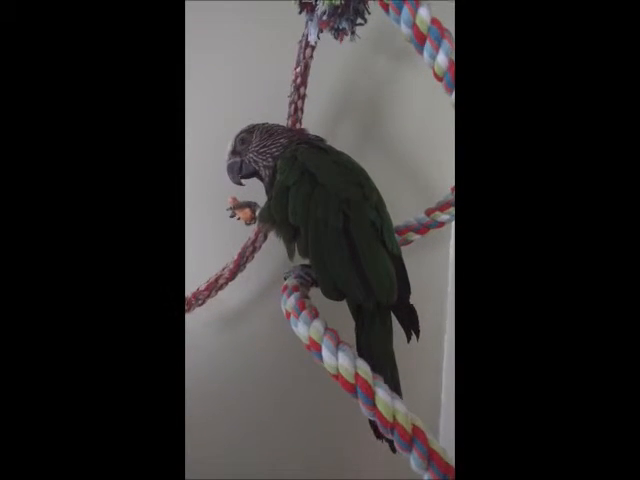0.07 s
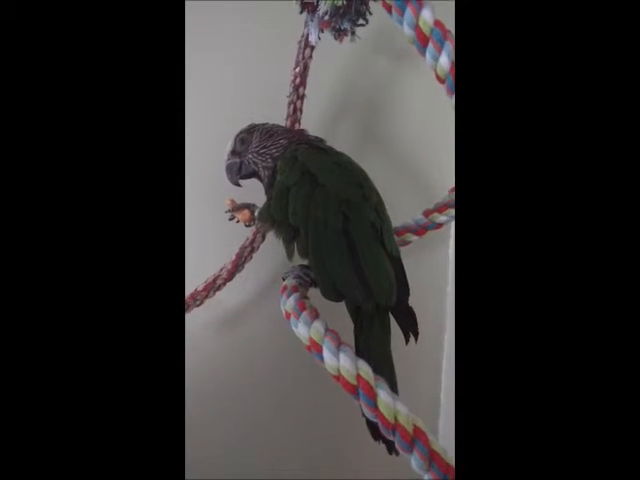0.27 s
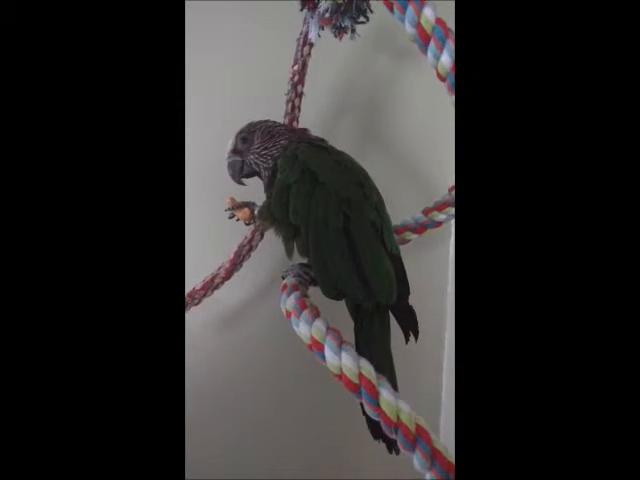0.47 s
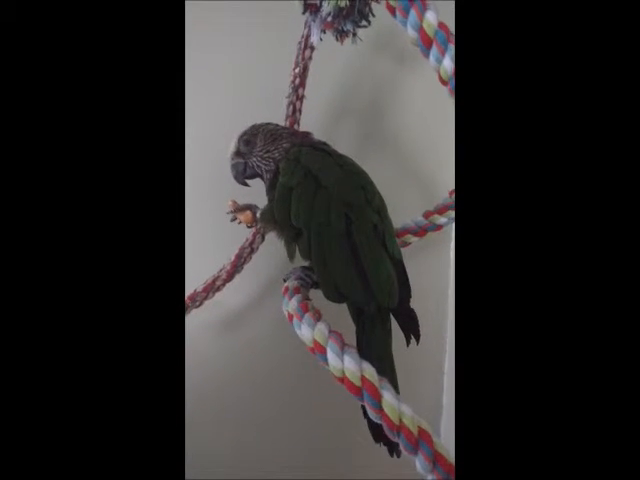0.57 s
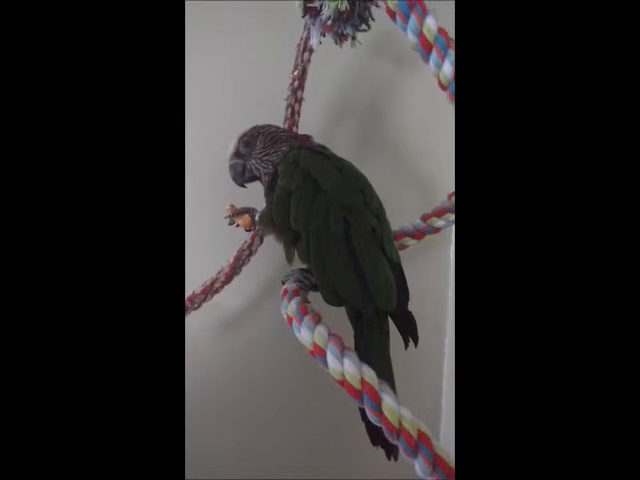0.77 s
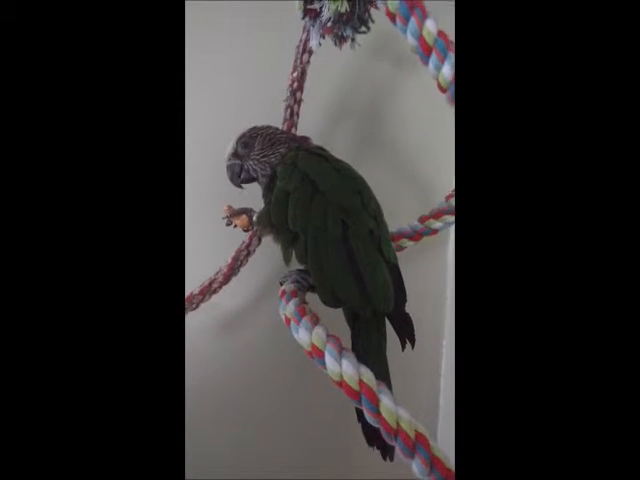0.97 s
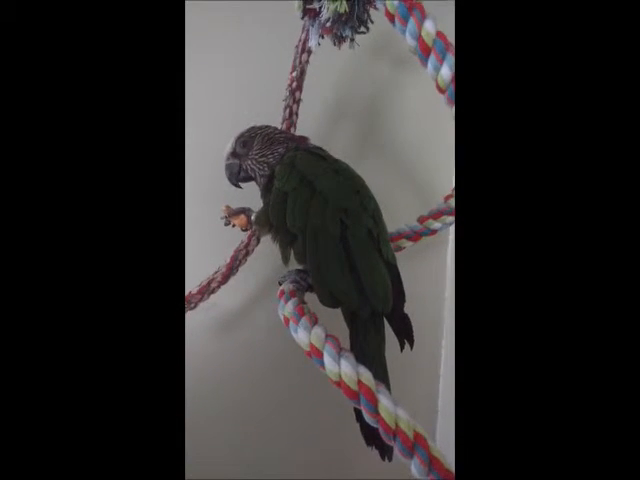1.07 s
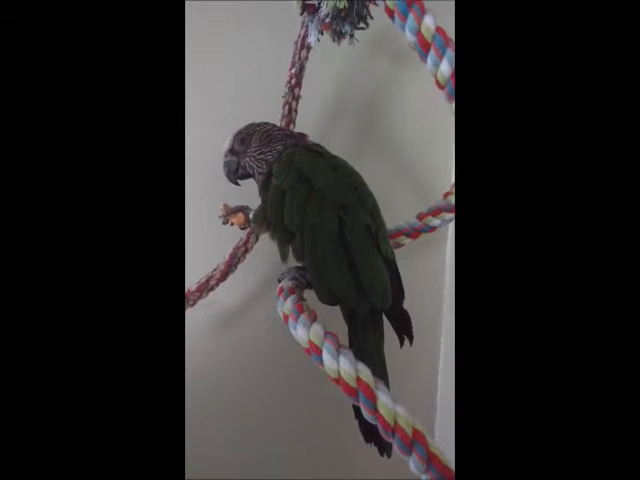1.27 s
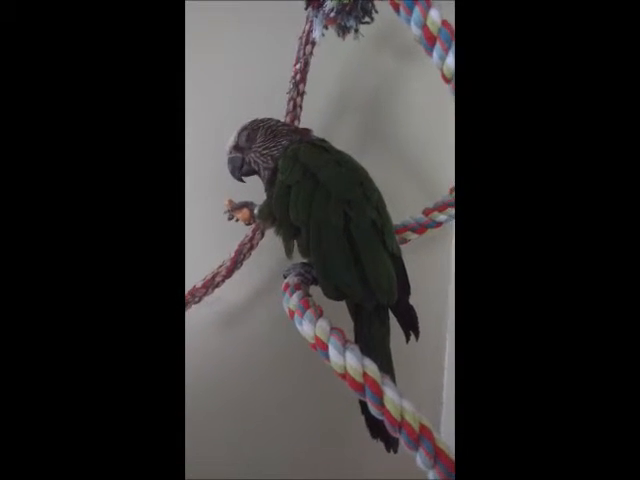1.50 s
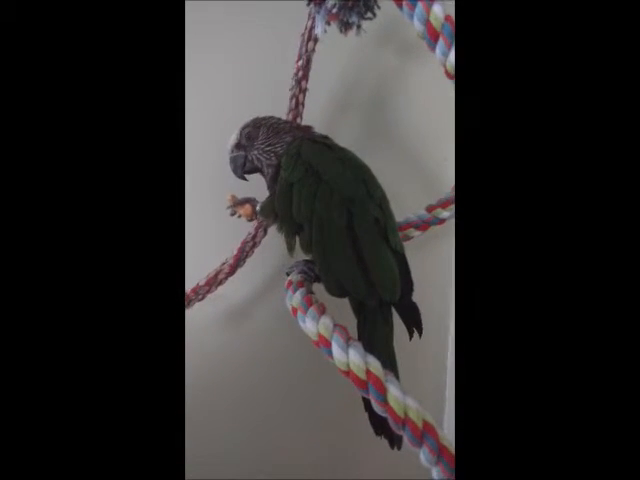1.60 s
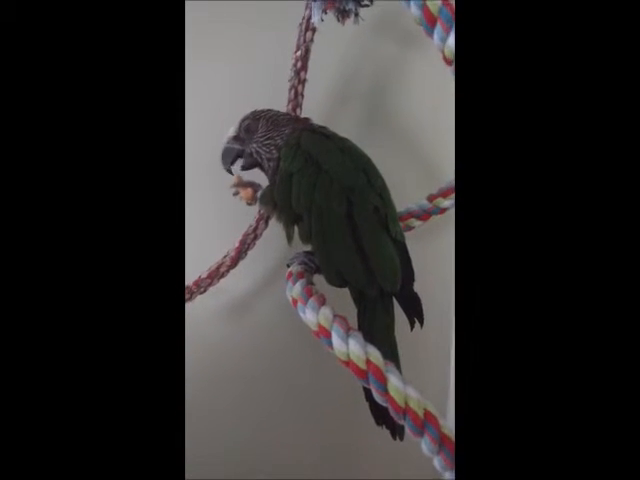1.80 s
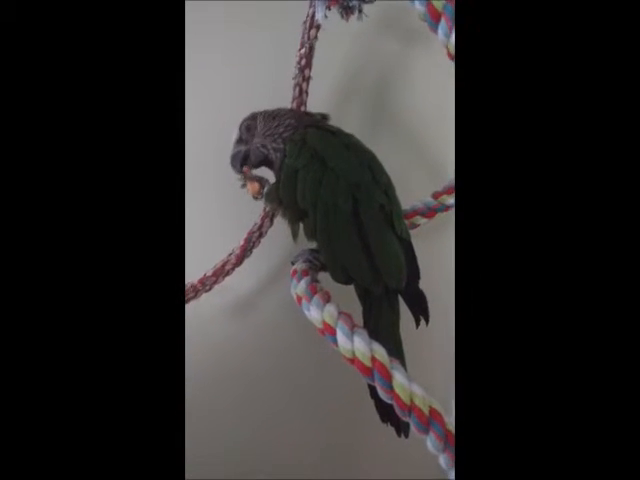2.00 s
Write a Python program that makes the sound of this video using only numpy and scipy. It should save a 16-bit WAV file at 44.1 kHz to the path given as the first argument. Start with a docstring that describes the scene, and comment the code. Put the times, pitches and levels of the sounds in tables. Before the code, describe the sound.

A parrot close to the microphone gives one short, rough, fluttering croak, then a tiny high chirp. Its beak ticks faintly on food, while an appliance hums and its fan whirs steadily in the small room.

```python
"""A small room, where an appliance hums and its fan whirs steadily in the background.
Up close, a parrot on a rope perch gives one short croak: a rough throat tone that flutters in
pitch and level, with rasp on each pulse. A tiny chirp follows, a scratch with thin tones ringing
out of it. The beak ticks on a morsel of food, and one faint squeak sounds at the very start."""
import sys
import numpy as np
from scipy import signal
from scipy.fft import rfft, irfft
from scipy.io import wavfile

SR = 44100
rng = np.random.default_rng(int(sys.argv[2]) if len(sys.argv) > 2 else 0)


def digitize_waveform(pressure):
    """Quantize a signal to 16-bit integers and store it at the path in sys.argv[1].

    Rows of a 2-D input are taken as channels; values are limited to [-1, 1].
    """
    field = np.atleast_2d(pressure).T
    bounded = np.clip(field, -1, 1)
    quanta = np.round(bounded * 32767).astype(np.int16)
    wavfile.write(sys.argv[1], SR, quanta)


N = 90404
T = np.arange(N) / SR
HZ = np.maximum(np.arange(N // 2 + 1) * SR / N, 1)
SIDES = np.array([[.5], [-.5]])   # splits a pan or a phase lead between left (+) and right (-)


def from_db(db):
    """Decibels to gain."""
    return 10 ** (np.asarray(db) / 20)


def unit_rms(x):
    """Scale to unit rms."""
    return x / np.sqrt(np.mean(x ** 2) + 1e-20)


def curve(points):
    """An automation curve at every sample."""
    return np.interp(T, *np.transpose(points))


def at_hz(points, hz):
    """Read an EQ curve on a log-frequency axis."""
    freqs, values = np.transpose(points)
    return np.interp(np.log(hz), np.log(freqs), values)


def noise(colour):
    """Coloured noise of unit rms."""
    return unit_rms(irfft(rfft(rng.standard_normal(N)) * from_db(at_hz(colour, HZ)), N))


def stereo_noise(colour):
    """Wide noise, unrelated left and right."""
    return np.array([noise(colour), noise(colour)])


def drift(rate_hz):
    """Smooth random modulation of unit rms."""
    return unit_rms(irfft(rfft(rng.standard_normal(N)) / (1 + (HZ / rate_hz) ** 2), N))


def burst(start_s, attack_s, hold_s, t60_s):
    """Attack, hold and exponential release."""
    age = T - start_s
    return np.clip(age / attack_s, 0, 1) * from_db(-60 * np.maximum(age - attack_s - hold_s, 0) / t60_s)


# Phase between the channels: freq_hz, left_lead_rad
STEREO_LEAD = [(60, 2), (130, 1.7), (290, .5), (640, -.1), (1250, -.1), (1700, 1), (2200, 2.8), (2600, 3.3),
               (5200, 9.4), (15600, 34.6)]
# Balance between the channels: freq_hz, pan_left_db
STEREO_PAN = [(60, -4), (110, 10.5), (200, -11), (380, 3), (580, 7.5), (730, 1.5), (900, 2), (1290, -1.5),
              (2380, -3), (4400, 1.5), (8120, 0.5), (15000, 0.5)]

def stereo_image(x):
    """Each frequency reaches the two microphone ports with its own phase and level difference."""
    lead = np.interp(HZ, *np.transpose(STEREO_LEAD)) * SIDES
    gain = from_db(at_hz(STEREO_PAN, HZ) * SIDES)
    return irfft(rfft(x) * np.exp(1j * lead) * gain / np.sqrt(np.mean(gain ** 2, axis=0)), N)


def room(x, level_db, t60_s, predelay_s=.003):
    """A short diffuse reverb tail, different on each side."""
    tail = rng.standard_normal((2, N)) * burst(predelay_s, .0033, 0, t60_s)
    tail /= np.sqrt(np.sum(tail ** 2, axis=1, keepdims=True))
    return from_db(level_db) * signal.fftconvolve(x[None], tail, axes=1)[:, :N]


# Colour of the fan noise: freq_hz, gain_db
FAN_EQ = [(25, -59), (55, -14), (80, -25), (110, -4.5), (165, 2.5), (205, -2), (260, 1.5), (350, -5),
          (600, -3), (820, -1), (1150, -4.5), (1450, -7), (1800, -3.5), (2300, -8), (2800, -13.5),
          (3500, -10), (4000, -18.5), (4800, -18), (6200, -21.5), (8000, -29.5), (10000, -30.5),
          (14500, -41), (15800, -56)]
# Tones of the motor hum: pitch_hz, level_db, pan_left_db, left_lead_rad
MOTOR_TONES = [(119.9, -47.5, 9.5, 2.23), (217.1, -45.5, 6.5, 1.97), (236.2, -57, 16.5, 1.6),
               (296, -60.5, 18.5, 3.6), (360.6, -55.5, 6, 1.4), (430.8, -49, 1.5, 0.8),
               (869, -63, 19, 0.23), (904, -65, -10, 0.82)]
# Level of the background, which dips briefly after the chirp: time_s, gain_db
BED_LEVEL = [(0, 0.5), (.63, -0.5), (.645, -4.5), (.76, -3), (.92, -.5), (1.25, 0.78), (2.04, 0)]

def appliance(fan_db=-40, waver_db=2, waver_rad=.3):
    """The bed: wavering motor tones over fan noise that the room colours."""
    whir = from_db(fan_db) * noise(FAN_EQ)
    bed = stereo_image(whir) + room(whir, level_db=-7, t60_s=.38)
    for hz, db, pan_db, lead in MOTOR_TONES:
        phase = 2 * np.pi * (hz * T + rng.random()) + waver_rad * drift(6)
        level = from_db(db + pan_db * SIDES + waver_db * drift(36))
        bed += np.sqrt(2) * level * np.sin(phase + lead * SIDES)
    return from_db(curve(BED_LEVEL)) * bed


def squeak(pitch_hz=3370, level_db=-49):
    """One faint, slightly unsteady whistle."""
    whistle = np.sin(2 * np.pi * pitch_hz * T + .7 * drift(120))
    return from_db(level_db) * whistle * burst(start_s=.022, attack_s=.0019, hold_s=.016, t60_s=.032)


# Colour shared by the ticks: freq_hz, gain_db
TICK_EQ = [(1500, -18), (3400, 10.5), (5000, -3.5), (6400, 3), (7800, -4.5), (9000, 0), (11000, -13.5),
           (14500, -11), (16500, -30)]
# Beak cues: start_s, gain_db, t60_s, low_cut_hz, high_cut_hz
BEAK_TICKS = [(0.1067, -36, 0.017, 5000, 9000), (0.493, -33.5, 0.015, 5500, 12100),
              (0.502, -42, .015, 4000, 11000), (0.928, -34, 0.037, 2800, 4500),
              (0.9557, -30.5, 0.014, 4940, 15000), (1.0264, -40, 0.023, 5500, 7000)]

def beak():
    """Small dry cracks of nibbling, some thinner and some duller than others."""
    crackle = stereo_noise(TICK_EQ)
    ticks = np.zeros((2, N))
    for start_s, db, t60_s, low_hz, high_hz in BEAK_TICKS:
        crack = crackle * from_db(db) * burst(start_s, attack_s=.0006, hold_s=.001, t60_s=t60_s)
        band = 1 / np.sqrt((1 + (low_hz / HZ) ** 4) * (1 + (HZ / high_hz) ** 4))
        ticks += irfft(rfft(crack) * band, N)
    return ticks


# Ringing tones of the chirp: pitch_hz, gain_db, t60_s, pan_left_db, left_lead_rad
CHIRP_TONES = [(6121, -2.5, .105, 4, 0), (6538, -15, .13, -2, -.9), (6952, -8.5, .135, 7, -.4),
               (7900, -1, .115, 2, 2.8), (8411, -7.5, .07, 14, .2), (8742, -16, .07, -6, .5),
               (9226, -13, .09, 2, -1.1), (9570, -15, .1, 0, -1.2), (10070, -17, .14, -2, -3),
               (10604, -2, .068, -4, 3), (10810, -13, .12, -2, -2.9), (11185, -14, .11, 0, -1.1),
               (12800, -12, .068, 16, 1.2), (15473, -21, .055, 19, 2)]
# Colour of its scratchy onset: freq_hz, gain_db
SCRATCH_EQ = [(4800, -43), (5600, -16), (6100, 12), (7400, -3), (9300, 0.5), (11700, -15), (12800, -1),
              (14200, -13), (15400, -5), (16300, -27)]

def chirp(start_s=.6276, attack_s=.00099, ring_db=-38, scratch_db=-38):
    """A brief scratch with thin tones ringing out of it, each with its own stereo placement."""
    ring = np.zeros((2, N))
    for hz, db, t60_s, pan_db, lead in CHIRP_TONES:
        tone = np.sin(2 * np.pi * hz * (T - start_s) + lead * SIDES)
        envelope = burst(start_s, attack_s, hold_s=.006, t60_s=t60_s)
        ring += from_db(ring_db + db + pan_db * SIDES) * tone * envelope
    scratch = stereo_noise(SCRATCH_EQ) * burst(start_s, attack_s, hold_s=.005, t60_s=.042)
    return ring + from_db(scratch_db) * scratch


# Throat resonances: freq_hz, gain_db
THROAT_EQ = [(450, -18), (580, -10), (725, -2.5), (810, -4.5), (920, -4), (1030, 4), (1170, 8),
             (1320, -2.5), (1500, 1.5), (1830, -5.5), (2100, -13.5), (2600, -9), (3600, -19), (5500, -32)]

def throat(pitch_hz, phase, brightness, growl_db=-17.5):
    """Eight harmonics through the throat; strong and weak vibrations alternate in patches of growl."""
    partials = [from_db(at_hz(THROAT_EQ, k * pitch_hz)) * np.sin(k * phase + k * k * np.pi / 4)
                for k in range(1, 9)]
    overtone_db = -6 * (2.5 - brightness)
    tone = np.sqrt(2) * (partials[0] + from_db(overtone_db) * sum(partials[1:]))
    return tone * (1 + from_db(growl_db) * drift(130) * np.cos(phase / 2))


# Speed of the flutter: time_s, rate_hz
FLUTTER_RATE = [(.30, 38.4), (.41, 38.2), (.425, 27.6)]
# Pitch between the pulses: time_s, pitch_hz
CROAK_PITCH = [(.25, 854.2), (.28, 752), (.296, 907.2), (.318, 829), (.344, 884), (.372, 785.4),
               (.394, 946), (.406, 1000), (.423, 892.5), (.442, 559)]
# Effort behind the tone: time_s, gain_db
CROAK_EFFORT = [(0.239, -30), (0.2395, -26), (0.248, -50), (0.26, -29.5), (0.273, -36.5), (0.277, -22),
                (0.287, -25.5), (0.295, -19.5), (.312, -22.5), (.33, -22.5), (.343, -20), (.355, -20.5),
                (0.365, -18), (.378, -22.5), (0.395, -16), (0.409, -22.5), (0.421, -22), (.432, -33),
                (.442, -25.5), (0.451, -23), (.456, -42)]
# How far the tone ducks as the throat narrows in each cycle: time_s, gain_db
THROAT_NARROWING = [(.275, -1), (.30, -8), (.324, -22), (.351, -37), (.378, -2), (.405, -7), (.432, -28)]
# Colour of the rasp: freq_hz, gain_db
RASP_EQ = [(300, -30), (600, -2), (1600, 4), (2100, 0.5), (2800, 5), (3600, -5), (4200, -1), (5300, -2),
           (6500, -11), (9000, -12), (14000, -28), (16000, -42)]
# Fader ride on the rasp: time_s, gain_db
RASP_FADER = [(.25, -45), (.29, -39), (.31, -30), (.335, -33), (.388, -35), (.414, -37.5), (.447, -41.5)]

def croak(full_flutter_s=.3095, build_s=.035, low_pitch_hz=592, rebound=.7, shimmer_db=1.5):
    """A rough tone flutters: each pulse drops its pitch, brings out the overtones and adds rasp."""
    cycles = np.cumsum(curve(FLUTTER_RATE)) / SR
    angle = 2 * np.pi * (cycles - np.interp(full_flutter_s, T, cycles))
    depth = np.clip(1 + (T - full_flutter_s) / build_s, .15, 1)
    pulse = .5 + .5 * np.cos(angle)

    skewed = angle + rebound * (1 - np.cos(angle))   # the pitch springs back early
    sag = (depth * (.5 + .5 * np.cos(skewed))) ** 1.25   # and stays high longer between pulses
    jitter = np.exp((.04 + .09 * (1 - depth)) * drift(298))   # roughest at the onset
    pitch_hz = (curve(CROAK_PITCH) * (1 - sag) + low_pitch_hz * sag) * jitter
    phase = 2 * np.pi * np.cumsum(pitch_hz) / SR
    tone = throat(pitch_hz, phase, brightness=depth * pulse)

    closing = np.exp(5.9 * (np.cos(angle - 2 * np.pi * .653) - 1))   # tightest 65% into each cycle
    effort = from_db(curve(CROAK_EFFORT) + curve(THROAT_NARROWING) * closing + shimmer_db * drift(160))
    rasp_gate = pulse ** 2.6 * (1 + .26 * np.cos(phase))   # short puffs that buzz with the tone
    rasp = from_db(curve(RASP_FADER)) * noise(RASP_EQ) * rasp_gate
    start_s, end_s = CROAK_EFFORT[0][0], CROAK_EFFORT[-1][0]
    return (tone * effort + rasp) * burst(start_s, attack_s=.0013, hold_s=end_s - start_s, t60_s=.018)


def scene(wall_echo_s=.0047, wall_echo_db=-13, detail_left_db=1.5):
    """The mix: the croak up front with a wall behind it, chirp and ticks leaning left, the bed below."""
    voice = croak()
    voice = voice + from_db(wall_echo_db) * np.interp(T - wall_echo_s, T, voice)
    voice = stereo_image(voice) + room(voice, level_db=-10, t60_s=.5)
    detail = chirp() + beak()
    detail_tail = room(detail[0], level_db=-13, t60_s=.12)   # treble dies quickly in the room
    detail = detail * from_db(detail_left_db * SIDES) + detail_tail
    return voice + detail + squeak() + appliance()


def record(dry):
    """A steep high cut on the master."""
    high_cut_hz = 16400
    return signal.sosfilt(signal.ellip(10, .1, 80, high_cut_hz, fs=SR, output="sos"), dry)


dry = scene()
out = record(dry)
digitize_waveform(out)
```